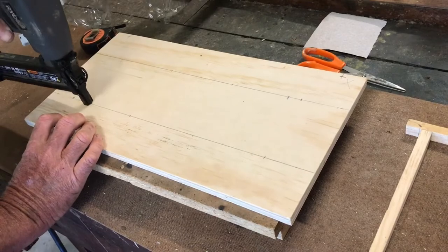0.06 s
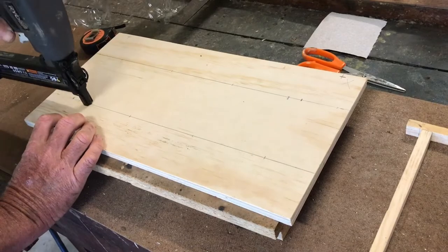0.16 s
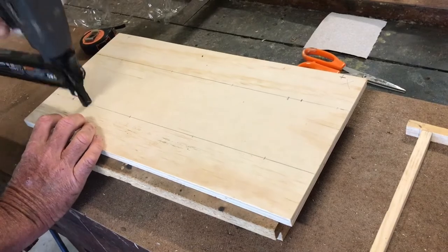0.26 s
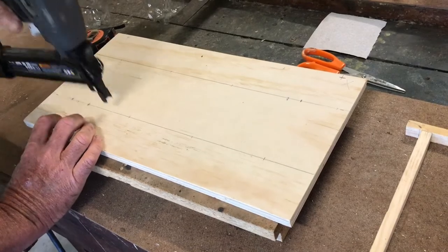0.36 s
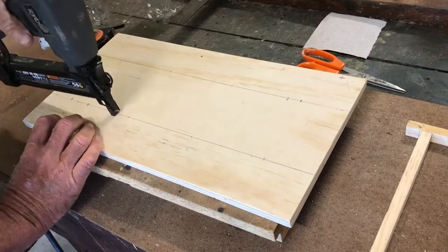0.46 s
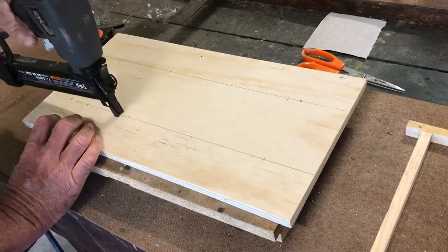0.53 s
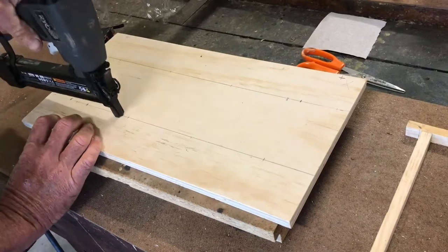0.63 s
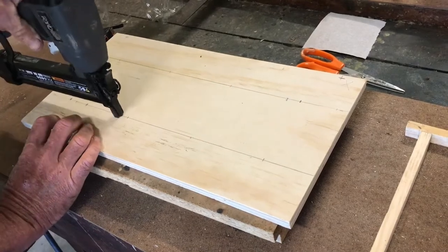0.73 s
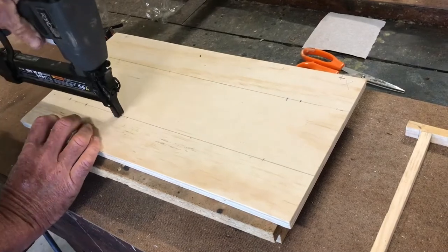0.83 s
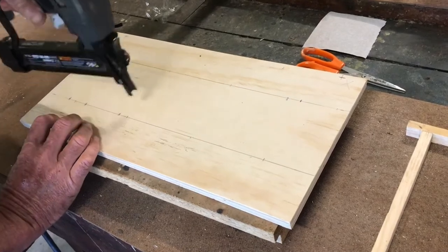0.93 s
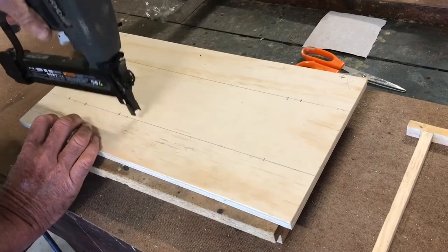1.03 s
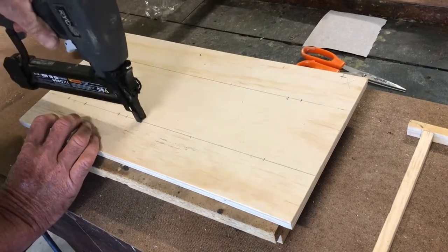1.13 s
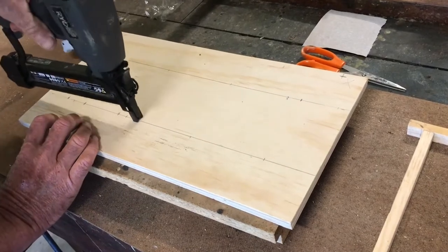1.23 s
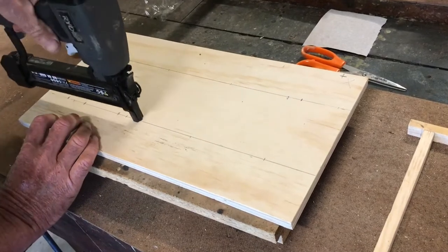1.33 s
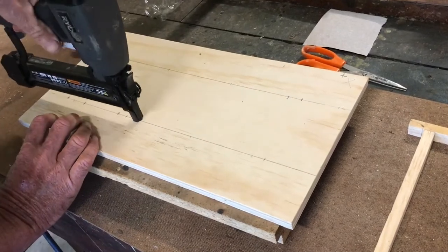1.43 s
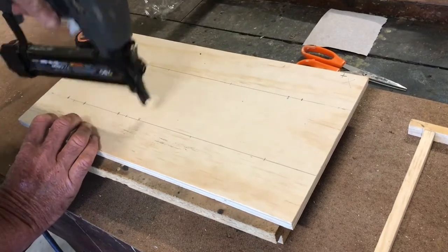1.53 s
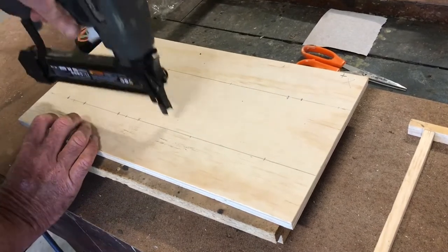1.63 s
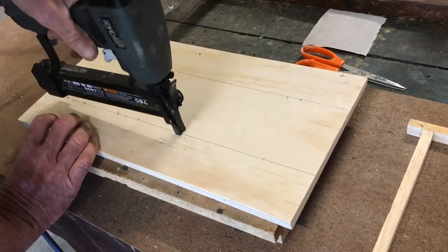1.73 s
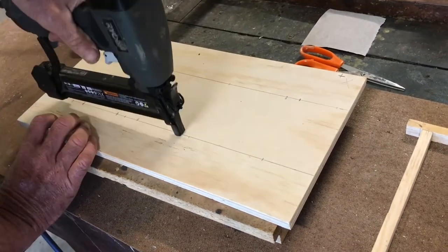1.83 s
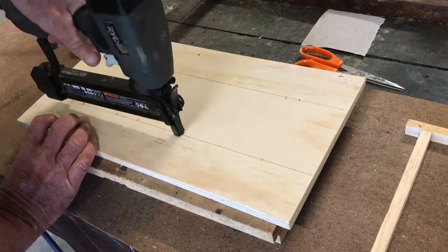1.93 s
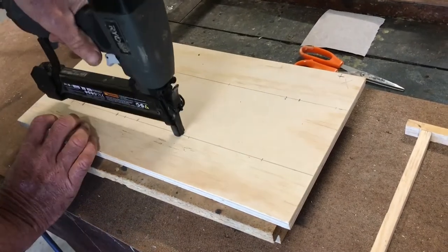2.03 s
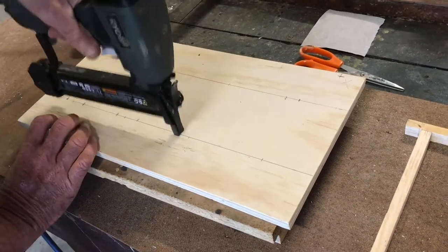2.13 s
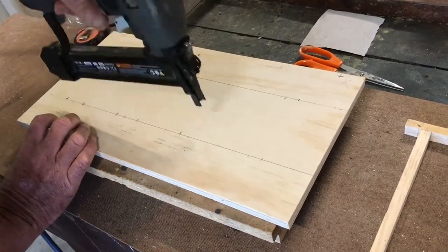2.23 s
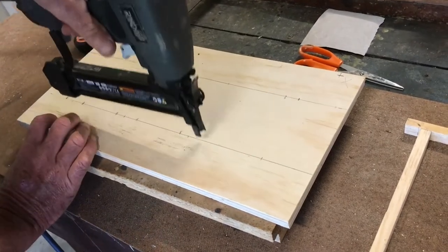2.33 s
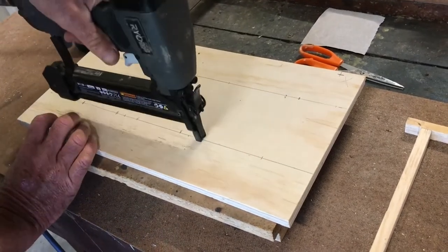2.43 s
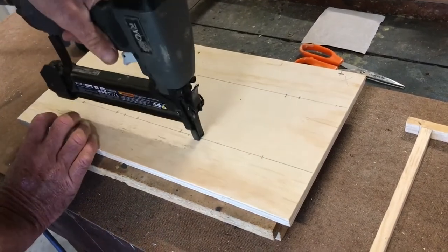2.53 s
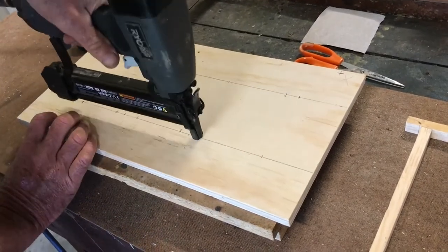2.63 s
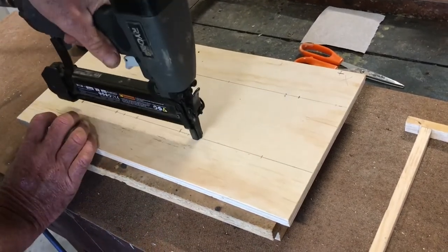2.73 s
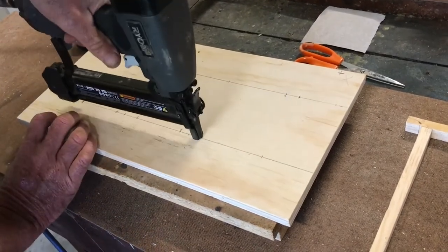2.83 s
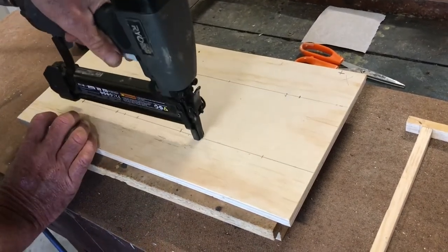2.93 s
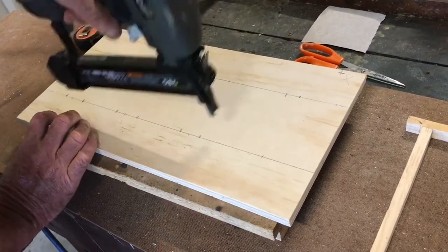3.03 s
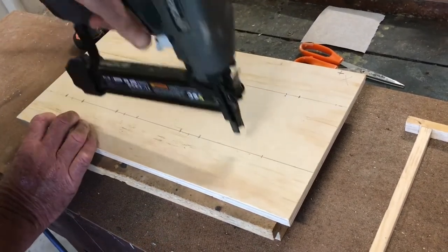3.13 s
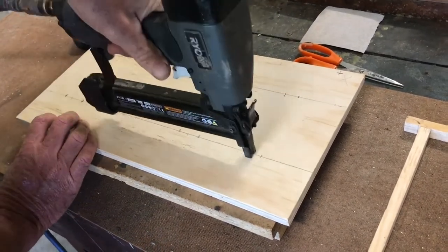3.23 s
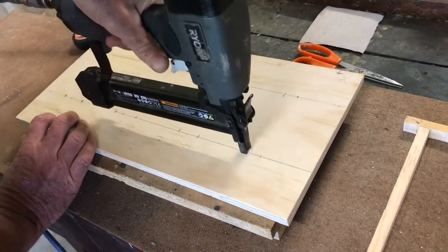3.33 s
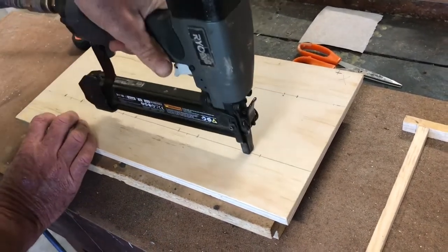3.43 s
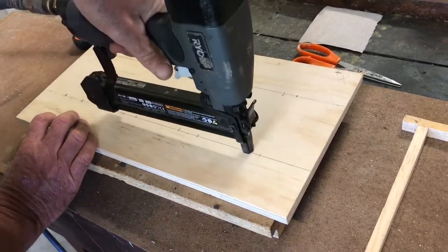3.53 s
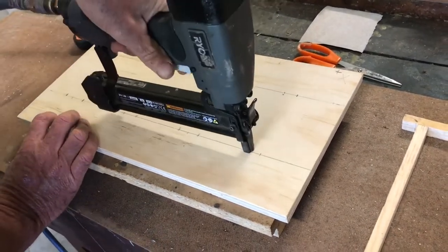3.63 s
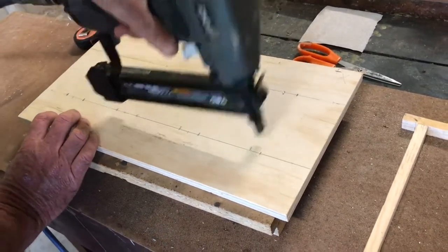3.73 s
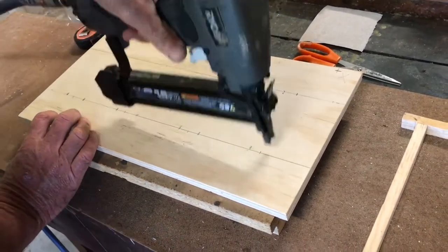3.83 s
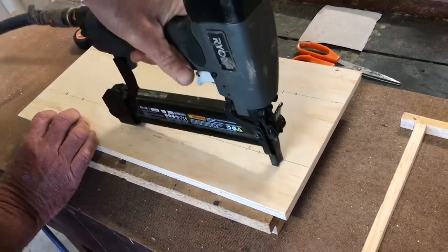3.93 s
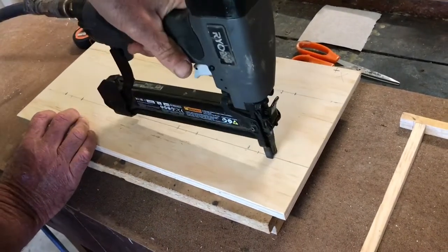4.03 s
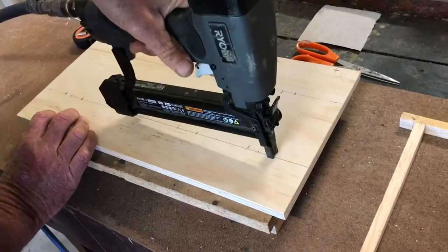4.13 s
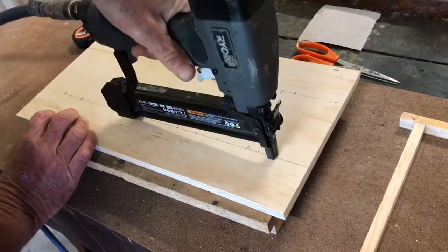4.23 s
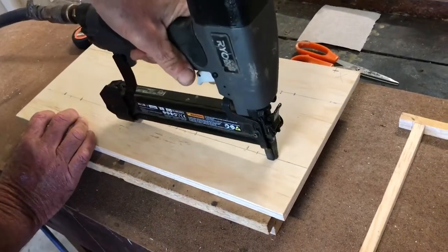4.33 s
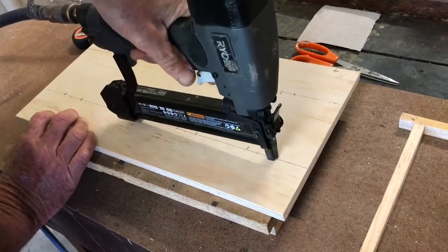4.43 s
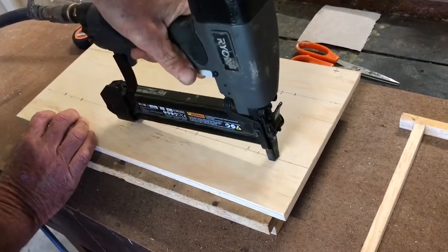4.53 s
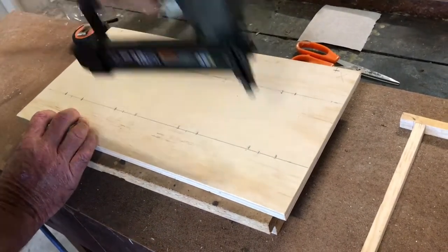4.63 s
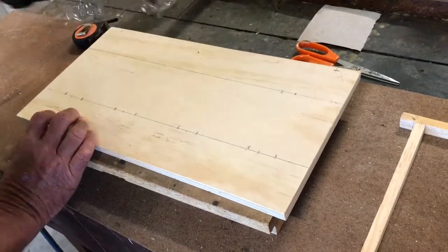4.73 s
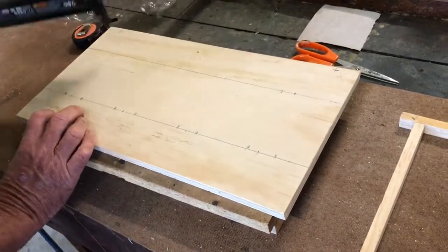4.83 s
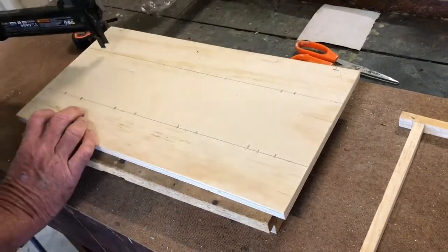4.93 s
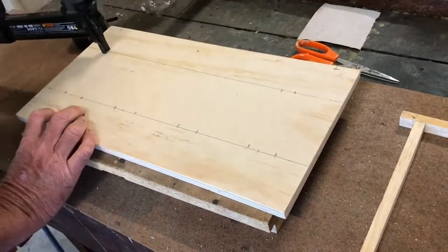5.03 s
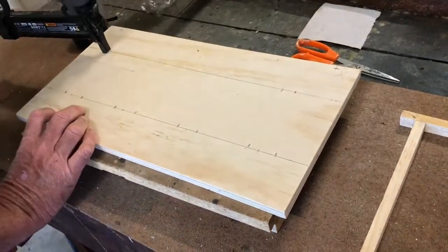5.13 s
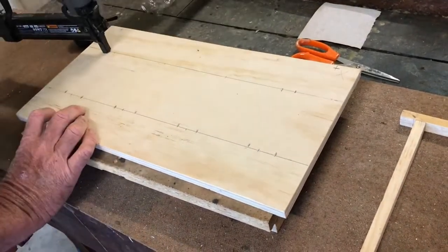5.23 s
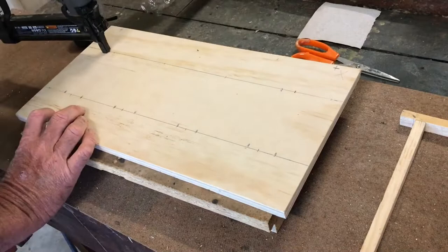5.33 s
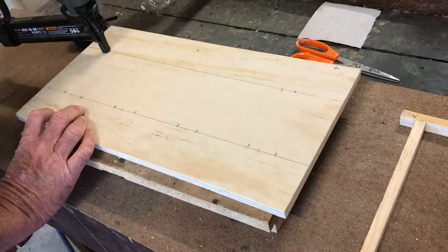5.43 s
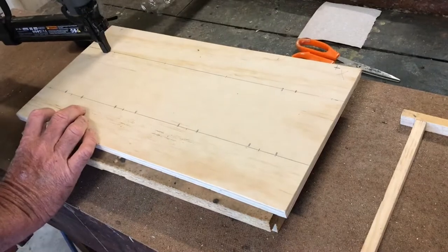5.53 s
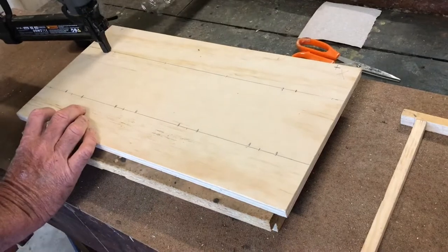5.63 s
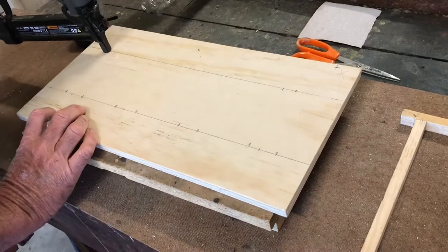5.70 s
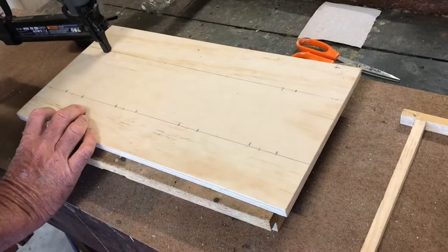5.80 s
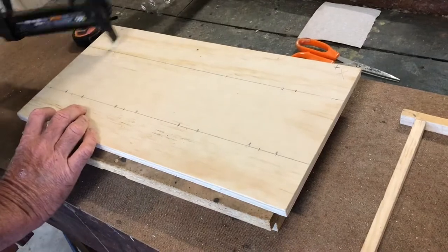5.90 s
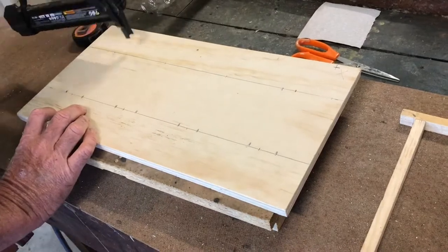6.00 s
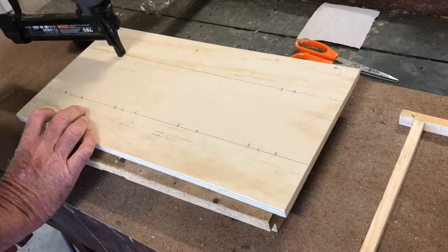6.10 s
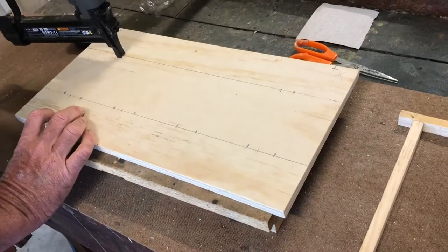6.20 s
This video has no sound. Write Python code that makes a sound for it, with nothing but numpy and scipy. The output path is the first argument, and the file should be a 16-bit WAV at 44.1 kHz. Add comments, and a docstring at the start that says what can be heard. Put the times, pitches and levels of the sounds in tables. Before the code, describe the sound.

An air stapler drives eight staples into plywood on a workbench, heard up close. Each shot is a sharp crack with a short woody ring, and all but the last are followed at once by a puff of air and a metallic clack. Seven come at a fairly even pace, then the last after a longer pause. Light clicks and soft knocks fall between them, over the faint rumble of a small workshop.

```python
"""Air stapler on plywood.

Eight staples go into a sheet on a workbench, in a small, faintly rumbling workshop. The nose is set
down, the valve spits, the driver slams the staple in and the board rings. After all but the last shot
the exhaust puffs and the piston clacks home. The safety catch clicks as the tool is lifted."""
import sys
import numpy as np
from scipy import signal
from scipy.fft import rfft, irfft
from scipy.io import wavfile

SR = 44100
rng = np.random.default_rng(int(sys.argv[2]) if len(sys.argv) > 2 else 0)


def log_audio(samples):
    """Write samples as a 16-bit WAV file to the path given in sys.argv[1]."""
    # one column per channel
    frames = np.atleast_2d(samples).T
    # limit to full scale, then quantise
    limited = np.clip(frames, -1, 1)
    pcm = np.round(limited * 32767).astype(np.int16)
    wavfile.write(sys.argv[1], SR, pcm)


N = 276066
TIME_S = np.arange(N) / SR
AGE_S = np.arange(SR // 2) / SR

# Safety catch on a lift or tilt. Each row: start in seconds, relative level in dB, pitch in Hz,
# treble gain in dB, settling delay in seconds.
CATCH_CLICKS = [(.009, -40.5, 2960, 6.5, 0.016), (0.4356, -23, 1510, -7, 0.026),
                (0.5072, -22.5, 1523, -22, .02), (1.1295, -25, 4250, -1, .033),
                (1.731, -20, 1970, -0.5, 0.021), (2.405, -25, 3410, 4, 0.045),
                (3.2267, -14, 3200, 3, 0.031), (3.289, -22.5, 1950, 3, 0.017),
                (3.914, -35, 3020, 4.5, 0.017), (4.0968, -49, 2800, -15, 0.018),
                (5.0095, -18.5, 3213, -2, 0.036), (6.1079, -21.5, 3130, 1, 0.021)]
# Nose landings. Each row: start in seconds, relative tick and thud levels in dB, slide in seconds.
LANDINGS = [(0.063, -36.5, -7, 0.0088), (.632, -35, 1.5, 0.013), (1.28, -29.5, 3, 0.017),
            (1.855, -30, 1, .14), (2.647, -34.5, 1.5, 0.15), (3.468, -37.5, -3, .13),
            (4.2528, -35, -4, 0.12), (5.1561, -34.5, -13.5, 0.022), (6.232, -31, -8, .05)]
# Staples fired. Each row: start in seconds, relative valve, board and wood crunch levels in dB.
SHOTS = [(0.2206, -1.5, -2, 3), (0.8334, -2.5, -4, 0.5), (1.449, -2.5, -3.5, -2.5), (2.0814, -1.5, -5, -4),
         (2.9266, -0.5, -5, -0.5), (3.6480, -1, -3, 2), (4.5001, 0, -7, 4.5), (5.8072, -2.5, -3.5, 4.5)]
# Trigger releases. Each row: start in seconds, relative puff and piston rebound levels in dB.
RELEASES = [(0.2653, -3, -2), (0.865, -3.5, -20), (1.492, -2, -3.5), (2.136, -2, -7), (2.9845, -3, -4.5),
            (3.7066, -6, -5.5), (4.5608, -5, -7.5)]

# Modes of the plywood and the tool. Each row: frequency in Hz, relative level in dB, T60 in seconds.
BOARD_MODES = [(128, -11, .27), (170, -4, .12), (198, -7, .2), (249, -3.5, .3), (269, -13, .45),
               (306, 0, .13), (385, -9, .11), (435, -15, .2), (495, -8, .09), (581, -14, .12),
               (652, -4, .12), (764, -13, .11)]
STEEL_MODES = [(1694, 0, .09), (1952, -12, .41), (2017, -2, .12), (2205, 0, .08), (2470, -2, .11),
               (2902, -5, .13), (3393, -1, .09), (3690, 2, .08), (4642, -6, .12), (4974, -13, .2),
               (5260, -5, .1), (7530, -17, .2), (11800, -10, .13)]

# Source spectra. Each row: frequency in Hz, relative spectral density in dB.
RUMBLE_SPECTRUM = [(15, -86.5), (25, -60.5), (64, -32.5), (80, -21.5), (102, 3), (130, -20), (200, -3),
                   (270, -15.5), (463, -18.5), (734, -26), (863, -31.5), (936, -29.5), (3720, -40),
                   (5280, -43.5), (16000, -49)]
RUSTLE_SPECTRUM = [(200, -6), (700, 13), (1200, 0.5), (2500, 2.5), (6300, -5.5), (9000, -11.5),
                   (16000, -22.5)]
SCRAPE_SPECTRUM = [(200, 1.5), (700, 12), (1200, -0.5), (2500, 4), (4000, -0.5), (6500, -3), (9000, -12.5),
                   (16000, -17.5)]
CATCH_SPECTRUM = [(100, -16.5), (700, -8.5), (900, -20), (1600, -5.5), (2400, -5), (3200, -4.5), (3700, -3),
                  (4400, -5.5), (7000, -6.5), (11000, -16), (14500, -9), (16000, -11.5)]
NOSE_SPECTRUM = [(100, 0), (600, 11), (1000, -0.5), (1700, 2.5), (3500, -0.5), (5800, -1.5), (8000, -10.5),
                 (16000, -16)]
VALVE_SPECTRUM = [(60, -15.5), (250, 4.5), (600, -7), (1100, -12.5), (2000, -2), (3200, -7.5), (4300, 2),
                  (5100, 4.5), (6000, -1), (8300, 1), (9700, -8), (12000, -4), (14000, 3), (16000, 1.5)]
DRIVER_SPECTRUM = [(40, -30), (150, -11.5), (350, -3), (650, -13.5), (900, -19), (1250, -12), (1800, 3.5),
                   (2700, -0.5), (3700, 0), (5500, -3), (7500, -5.5), (9500, -12.5), (12000, -9.5),
                   (16000, -15.5)]
CRUNCH_SPECTRUM = [(60, -19), (350, -3), (650, 1.5), (900, -10), (1350, -4.5), (2200, -10.5), (6000, -27.5)]
EXHAUST_SPECTRUM = [(60, -4.5), (450, -0.5), (1200, -8.5), (2100, 0), (3200, -4.5), (5000, 2), (8000, 3),
                    (10000, -2.5), (12500, 6.5), (16000, -13.5)]
HARD_STOP_SPECTRUM = [(100, -10), (500, -5), (1000, -13), (1500, -4), (2150, 7.5), (2700, -9.5), (3300, -1),
                      (4300, -4), (5100, 3.5), (7000, -6), (9000, -10), (11700, -1), (13500, -3.5),
                      (16000, -5.5)]
SOFT_STOP_SPECTRUM = [(100, -6), (400, -8), (1000, -22), (1600, -7), (2150, 1), (3000, -6), (4200, -10),
                      (5200, -2), (6500, -8), (9000, -20), (11700, -10), (16000, -21)]

# Workshop echo tail. Each row: frequency in Hz, level in dB.
TAIL_LEVELS = [(100, -20.5), (300, -15.5), (900, -20), (2000, -20.5), (5000, -11), (8000, -10.5),
               (12000, -9), (16000, -18)]
# Its decay. Each row: frequency in Hz, T60 in seconds.
TAIL_DECAYS = [(100, .27), (900, .3), (2000, .36), (5000, .44), (8000, .43), (12000, .39), (16000, .36)]


def from_db(db):
    """Decibels to gain."""
    return 10 ** (np.asarray(db) / 20)


def at_hz(points, hz):
    """Interpolate a table over log frequency."""
    points = np.array(points)
    return np.interp(np.log(np.maximum(hz, 1)), np.log(points[:, 0]), points[:, 1])


def add(track, start_s, sound):
    """Mix a sound in at start_s."""
    start = max(round(start_s * SR), 0)
    track[start:start + len(sound)] += sound[:max(N - start, 0)]


def colour(x, spectrum, size=4096):
    """Minimum-phase filter; keeps the power of white noise."""
    gain = from_db(at_hz(spectrum, np.linspace(0, SR / 2, size // 2 + 1)))
    cepstrum = irfft(np.log(gain / np.sqrt(np.mean(gain ** 2))))
    cepstrum[1:size // 2] *= 2
    cepstrum[size // 2 + 1:] = 0
    return signal.fftconvolve(x, irfft(np.exp(rfft(cepstrum))))[:N]


def ring(force, modes):
    """Damped modes driven by a force; neighbours swing in opposite senses."""
    out = np.zeros(N)
    for k, (hz, db, t60_s) in enumerate(modes):
        radius = from_db(-60 / (t60_s * SR))
        feedback = [1, -2 * radius * np.cos(2 * np.pi * hz / SR), radius ** 2]
        out += (-1) ** k * from_db(db) * signal.lfilter([.5, 0, -.5], feedback, force + 1e-18)
    return out


def burst(t60_s, rise_s=0, hold_s=0):
    """Noise that swells, holds and dies: an air jet, or the dense modes of a struck part."""
    swell = np.minimum((AGE_S + 1 / SR) / (rise_s + 1 / SR), 1) ** 2
    decay = from_db(-60 * np.maximum(AGE_S - hold_s, 0) / t60_s)
    return rng.standard_normal(len(AGE_S)) * swell * decay


def clack(t60_s, spike):
    """Hard contact: one spike, then a short rattle."""
    return burst(t60_s) + spike * (AGE_S == 0)


def push(contact_s):
    """Half-sine force of unit area; longer is duller."""
    force = np.sin(np.pi * np.minimum((AGE_S + 1 / SR) / (contact_s + 2 / SR), 1))
    return force / force.sum()


def air_pulse(delay_s, width_s):
    """A brief displacement of air radiates its second derivative."""
    u = (AGE_S - delay_s) / width_s
    return (u * u - 1) * np.exp(-u * u / 2)


def hand_speed(peak_s, hold_s=0, attack_s=.076, release_s=.05):
    """Hand speed, 0 to 1: builds, holds, dies away."""
    before_s = np.maximum(peak_s - TIME_S, 0)
    after_s = np.maximum(TIME_S - peak_s - hold_s, 0)
    return np.exp(-(before_s / attack_s) ** 2 - (after_s / release_s) ** 2)


def room_rumble(level_db=-58):
    """Steady low room noise."""
    return from_db(level_db) * colour(rng.standard_normal(N), RUMBLE_SPECTRUM)


def lift_rustle(lift_db=-67, hiss_db=-71):
    """The tool rustles as it is lifted, over steady room hiss."""
    speed = np.max([hand_speed(start_s) for start_s, *_ in CATCH_CLICKS], axis=0)
    envelope = np.hypot(from_db(hiss_db), from_db(lift_db) * speed)
    return envelope * colour(rng.standard_normal(N), RUSTLE_SPECTRUM)


def snap(db, hz, treble_db):
    """A small steel part snaps: a clack with one resonance and a treble shelf."""
    hit = from_db(db - 6.5) * clack(t60_s=.015, spike=1.7)
    body = signal.lfilter(*signal.iirpeak(hz, Q=4.8, fs=SR), hit)
    treble = signal.lfilter(*signal.butter(1, 5500, "high", fs=SR), hit)
    return hit + from_db(5) * body + (from_db(treble_db) - 1) * treble


def catch_and_magazine(settle_db=-14.5, press_delay_s=.02, rattle_start_s=3.3659, rattle_gap_s=.023):
    """The catch snaps out, settles, and is pressed in on landing; loose staples tap in the magazine."""
    out = np.zeros(N)
    for start_s, db, hz, treble_db, settle_s in CATCH_CLICKS:
        add(out, start_s, snap(db, hz, treble_db))
        add(out, start_s + settle_s, snap(db + settle_db, hz, treble_db))
    for start_s, tick_db, _, _ in LANDINGS:
        add(out, start_s + press_delay_s, snap(tick_db - 12.5, hz=4600, treble_db=5))
    for k in range(3):
        add(out, rattle_start_s + k * rattle_gap_s, snap(db=-41, hz=2800, treble_db=-9.5))
    return colour(out, CATCH_SPECTRUM)


def nose_scrape(level_db=-63):
    """The steel nose slides over plywood to its mark."""
    speed = np.max([hand_speed(start_s, slide_s) for start_s, _, _, slide_s in LANDINGS], axis=0)
    return from_db(level_db) * speed * colour(rng.standard_normal(N), SCRAPE_SPECTRUM)


def nose_landings(firm_contact_s=.0027, firm_tick_db=-28.5, halving_db=9):
    """The nose ticks on the wood; the tool's weight dips the board and sets it ringing."""
    tick, board_force, dip = np.zeros((3, N))
    for start_s, tick_db, thud_db, _ in LANDINGS:
        contact_s = firm_contact_s * 2 ** ((firm_tick_db - tick_db) / halving_db)  # firmer is shorter
        touch = from_db(2.5) * clack(t60_s=.011, spike=1.9) + from_db(-13) * burst(t60_s=.13)
        add(tick, start_s, from_db(tick_db) * touch)
        add(board_force, start_s + .00054, from_db(thud_db - 27.5) * push(contact_s))
        add(dip, start_s, -from_db(thud_db - 29.5) * air_pulse(delay_s=.0055, width_s=.001))
    return colour(tick, NOSE_SPECTRUM) + ring(board_force, BOARD_MODES) + dip


def shots(valve_lead_s=.019, seat_lag_s=.003, recoil_lag_s=.0062):
    """The valve spits; the driver shears off a staple and seats it; the tool recoils on the board."""
    hiss, crack, crunch, steel_force, board_force, thump = np.zeros((6, N))
    for start_s, valve_db, board_db, crunch_db in SHOTS:
        spit = burst(t60_s=.034, rise_s=.006, hold_s=.0068)
        add(hiss, start_s - valve_lead_s, from_db(valve_db - 19) * spit)
        # Same air pressure every shot, so the driver's levels are constant.
        add(crack, start_s, from_db(-8) * clack(t60_s=.011, spike=-3))
        add(crack, start_s + seat_lag_s, from_db(-6.5) * burst(t60_s=.026, hold_s=.00052))
        add(crack, start_s + recoil_lag_s, from_db(-19.5) * burst(t60_s=.2))  # magazine rattle
        add(crunch, start_s, from_db(crunch_db - 17.5) * burst(t60_s=.1, rise_s=.0063))
        add(steel_force, start_s + rng.uniform(0, seat_lag_s), from_db([-28]))
        add(board_force, start_s + seat_lag_s, from_db(board_db - 22) * push(contact_s=.000067))
        add(thump, start_s, from_db(board_db - 7) * air_pulse(delay_s=.0087, width_s=.00085))
    impact = colour(crack, DRIVER_SPECTRUM) + colour(crunch, CRUNCH_SPECTRUM) + thump
    ringing = ring(steel_force, STEEL_MODES) + ring(board_force, BOARD_MODES)
    return colour(hiss, VALVE_SPECTRUM) + impact + ringing


def exhaust(spurt_db=-20, trail_db=-41):
    """The cylinder vents: a low puff, a spurt of hiss, then a slower trail of air."""
    hiss, puff = np.zeros((2, N))
    for start_s, puff_db, _ in RELEASES:
        spurt = burst(t60_s=.045, rise_s=.0012, hold_s=.003)
        spurt += burst(t60_s=.06, rise_s=.002, hold_s=.01) / 2
        add(hiss, start_s - .0005, from_db(spurt_db) * spurt)
        add(hiss, start_s, from_db(trail_db) * burst(t60_s=.43, rise_s=.0086, hold_s=.03))
        add(puff, start_s, from_db(puff_db - 10) * air_pulse(delay_s=.0048, width_s=.0012))
    return colour(hiss, EXHAUST_SPECTRUM) + puff


def piston_return(return_s=.0092, rebound_s=.0066, stop_db=-1.5, stop_hardness=.85, rebound_hardness=.14):
    """The piston clacks brightly on its top stop and rebounds once, duller."""
    hard, soft, steel_force, board_force = np.zeros((4, N))
    for start_s, _, rebound_db in RELEASES:
        stop = (start_s + return_s, stop_db, stop_hardness)
        rebound = (start_s + return_s + rebound_s, rebound_db, rebound_hardness)
        for hit_s, db, hardness in (stop, rebound):
            blow = clack(t60_s=.01, spike=5.5)
            add(hard, hit_s, from_db(db - 5) * hardness * blow)
            add(soft, hit_s, from_db(db - 4) * (1 - hardness) * blow)
            add(steel_force, hit_s, from_db([db - 39.5]))
            add(board_force, hit_s, from_db(db - 40) * push(contact_s=.0016))  # jolt through the nose
    clacks = colour(hard, HARD_STOP_SPECTRUM) + colour(soft, SOFT_STOP_SPECTRUM)
    return clacks + ring(steel_force, STEEL_MODES) + ring(board_force, BOARD_MODES)


def workshop_echo(x, delay_s=.007, early_db=-9, early_t60_s=.081, low_cut_hz=170):
    """Near surfaces answer fast; the diffuse tail dies at its own rate per band. Thin in the bass."""
    age_s = np.arange(SR) / SR
    edges_hz = np.geomspace(50, 18000, 15)
    white, response = rng.standard_normal((2, SR)), np.zeros(SR)
    early = from_db(-60 * age_s / early_t60_s)
    early *= from_db(early_db) / np.linalg.norm(early)
    for k, (low_hz, high_hz) in enumerate(zip(edges_hz, edges_hz[1:])):
        centre_hz = np.sqrt(low_hz * high_hz)
        tail = from_db(-60 * age_s / at_hz(TAIL_DECAYS, centre_hz))
        tail *= from_db(at_hz(TAIL_LEVELS, centre_hz)) / np.linalg.norm(tail)
        band = signal.butter(2, [low_hz, high_hz], "band", fs=SR, output="sos")
        response += signal.sosfilt(band, white[k % 2] * np.hypot(tail, early))
    echo = np.zeros(N)
    add(echo, delay_s, signal.fftconvolve(x, response)[:N])
    return signal.sosfilt(signal.butter(2, low_cut_hz, "high", fs=SR, output="sos"), echo)


def scene():
    """Close stapler, its echo, room and handling noise; mono."""
    tool = shots() + exhaust() + piston_return() + nose_landings() + catch_and_magazine()
    return (tool + workshop_echo(tool) + room_rumble() + lift_rustle() + nose_scrape())[None]


def record(dry, ceiling=.85, cutoff_hz=16000):
    """Soft clip, then a steep low-pass."""
    rounded = ceiling * dry / (ceiling ** 4 + dry ** 4) ** .25
    return signal.sosfilt(signal.ellip(10, .1, 90, cutoff_hz, fs=SR, output="sos"), rounded)


dry = scene()
out = record(dry)
log_audio(out)
```